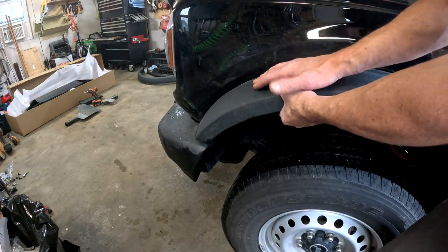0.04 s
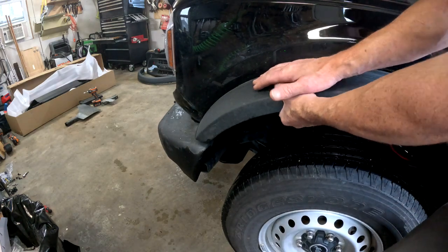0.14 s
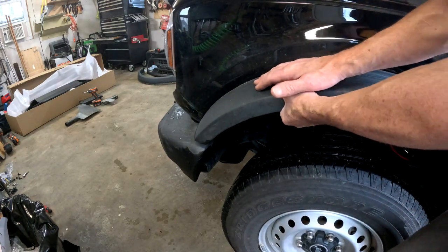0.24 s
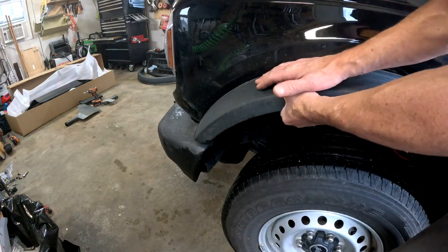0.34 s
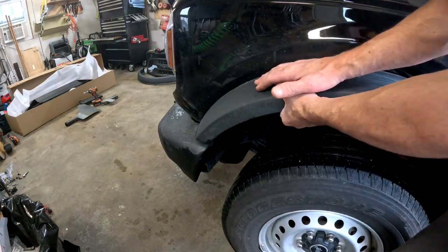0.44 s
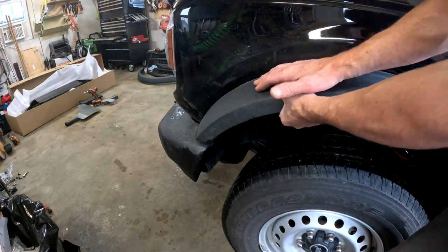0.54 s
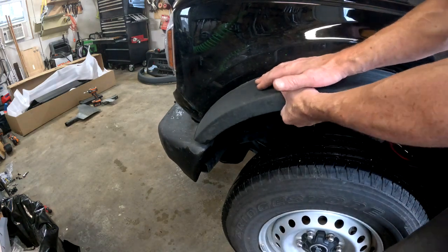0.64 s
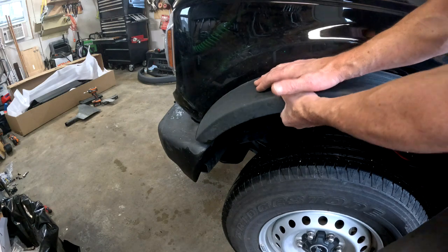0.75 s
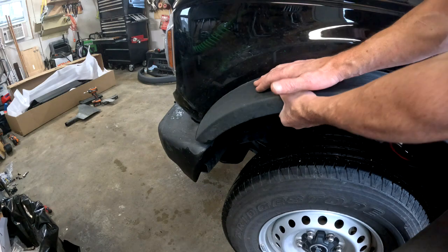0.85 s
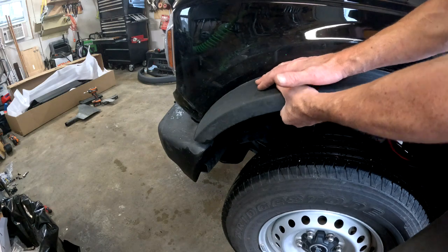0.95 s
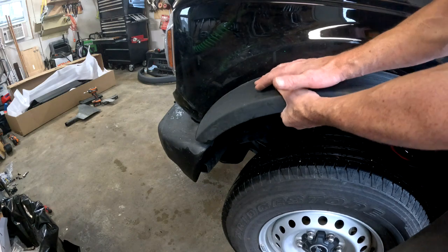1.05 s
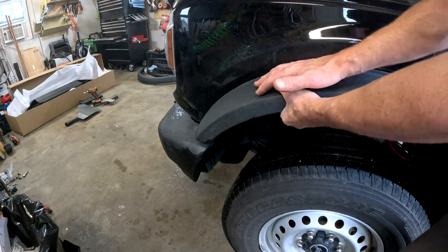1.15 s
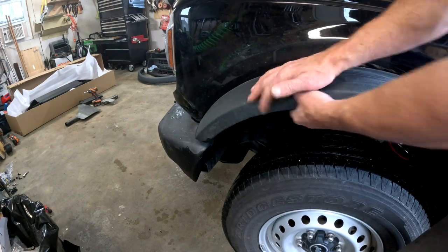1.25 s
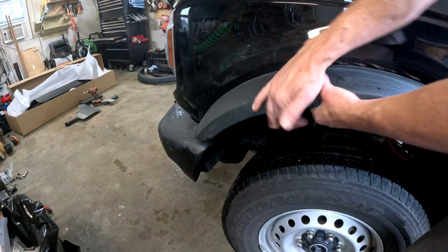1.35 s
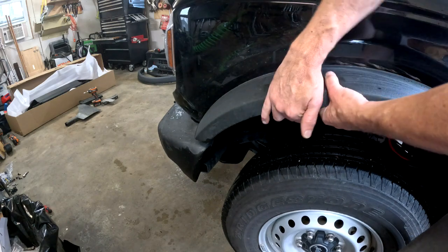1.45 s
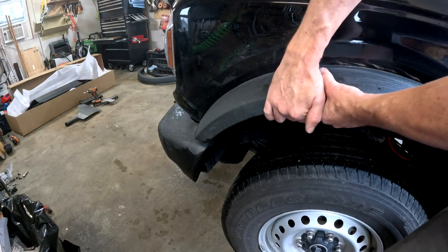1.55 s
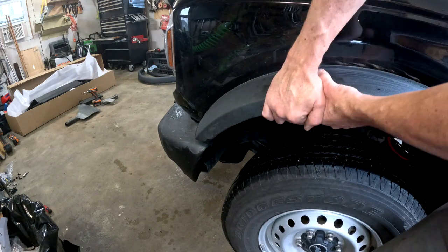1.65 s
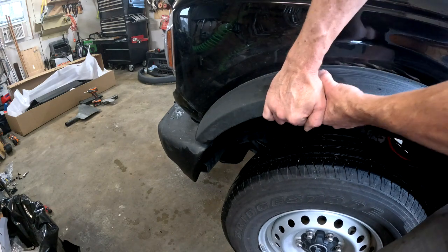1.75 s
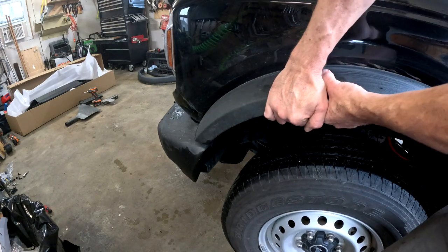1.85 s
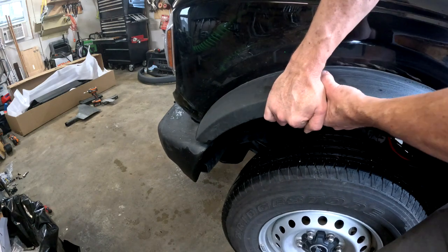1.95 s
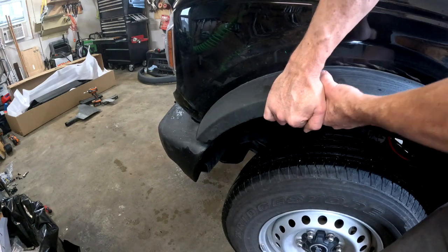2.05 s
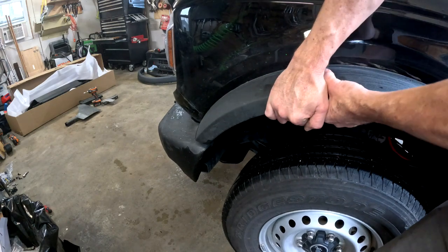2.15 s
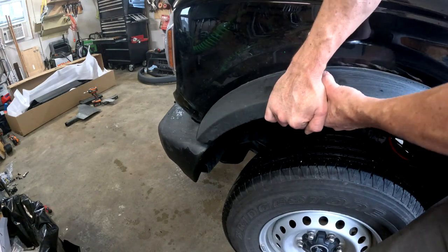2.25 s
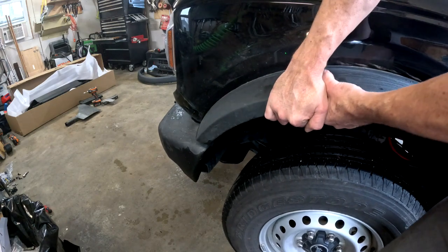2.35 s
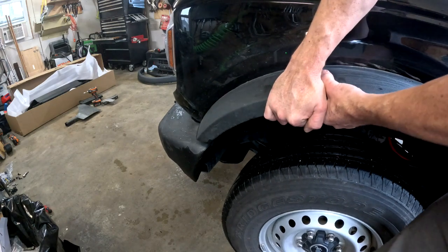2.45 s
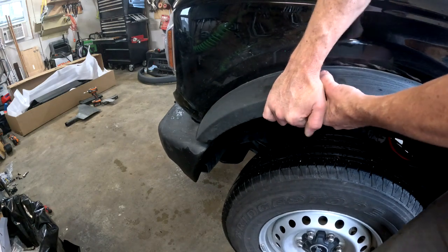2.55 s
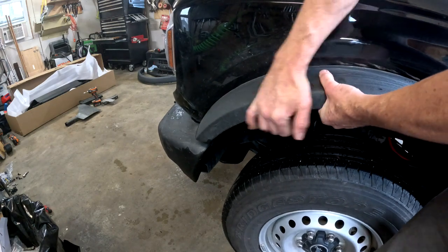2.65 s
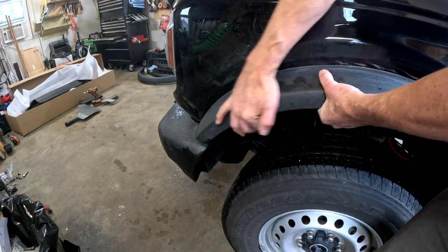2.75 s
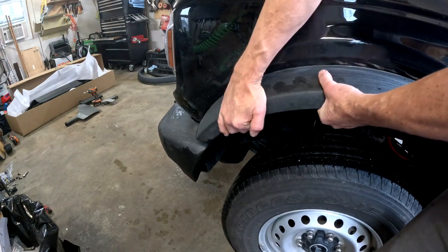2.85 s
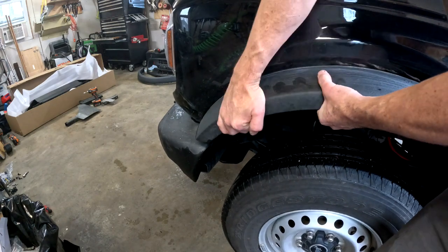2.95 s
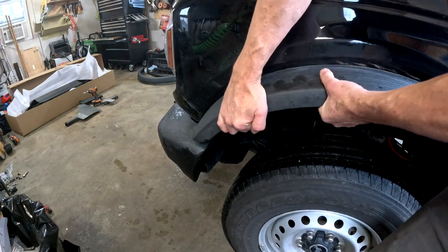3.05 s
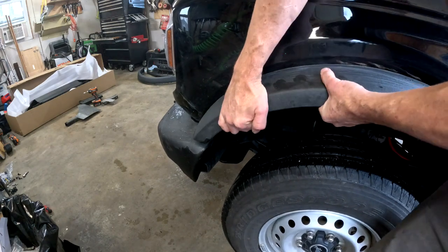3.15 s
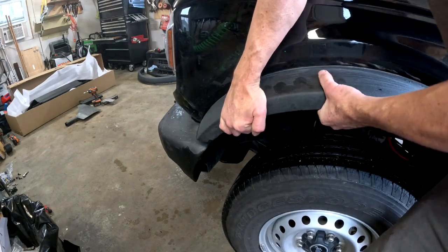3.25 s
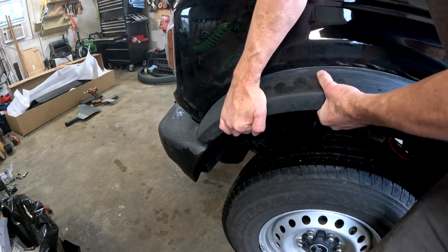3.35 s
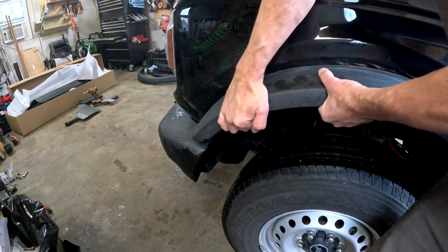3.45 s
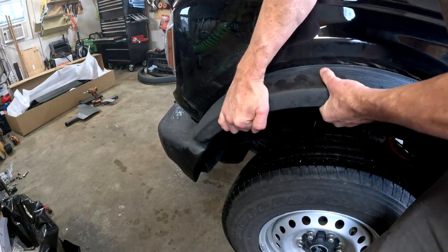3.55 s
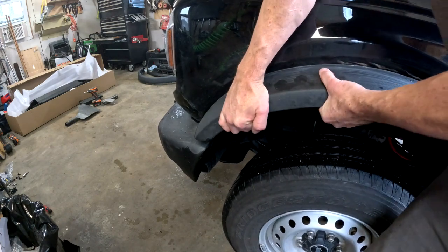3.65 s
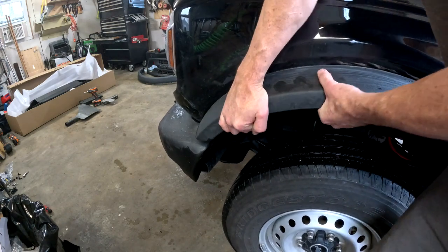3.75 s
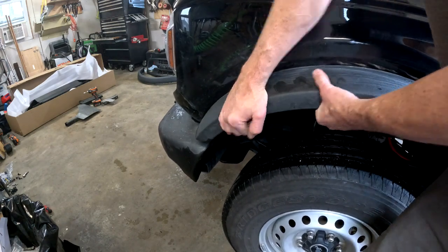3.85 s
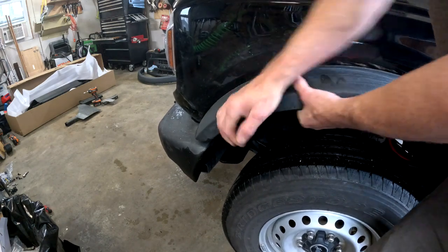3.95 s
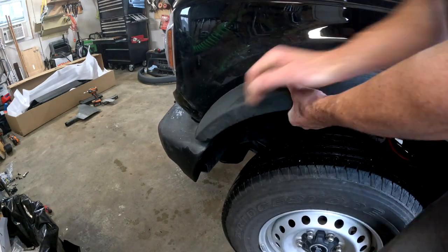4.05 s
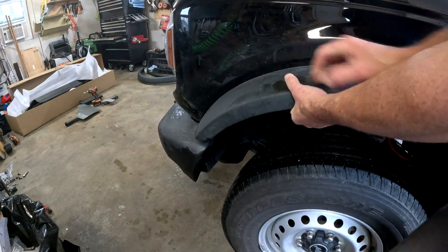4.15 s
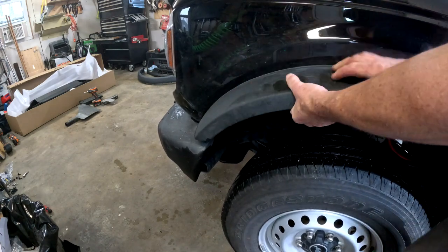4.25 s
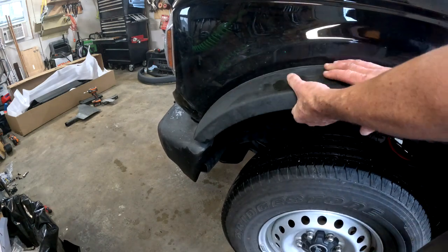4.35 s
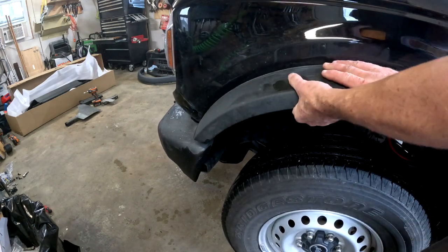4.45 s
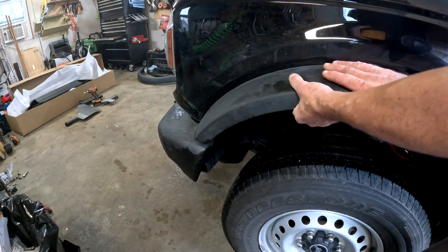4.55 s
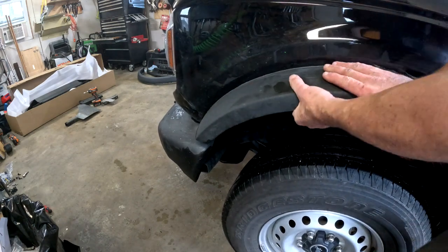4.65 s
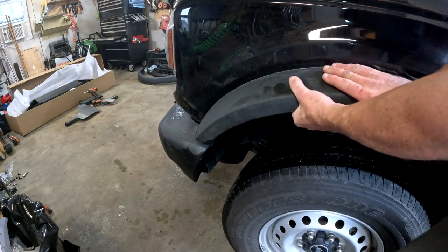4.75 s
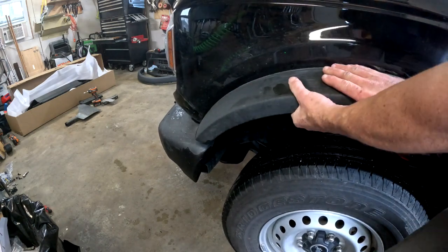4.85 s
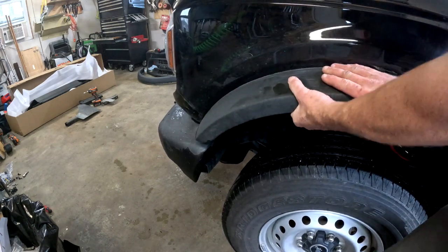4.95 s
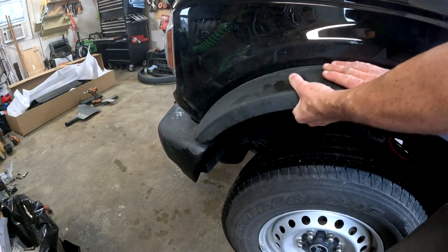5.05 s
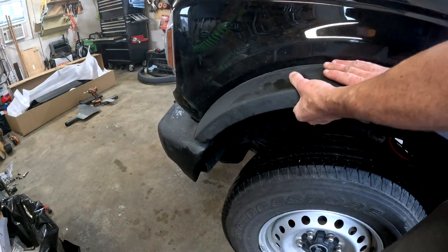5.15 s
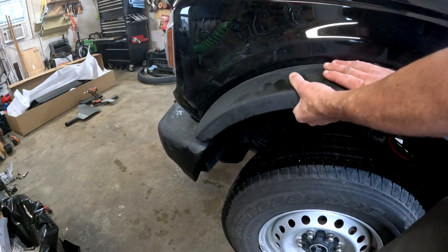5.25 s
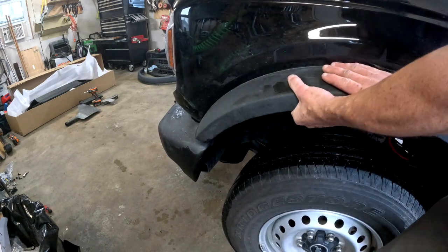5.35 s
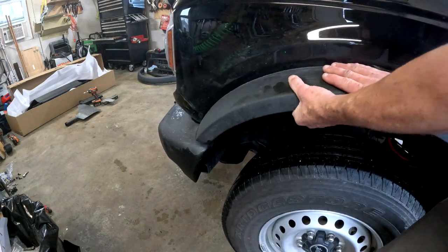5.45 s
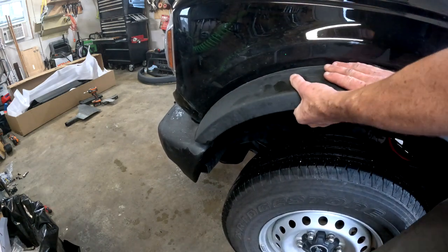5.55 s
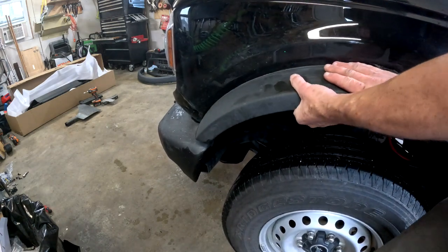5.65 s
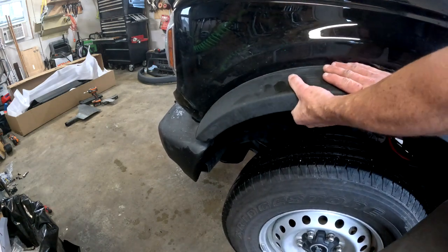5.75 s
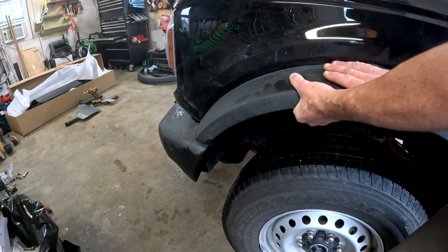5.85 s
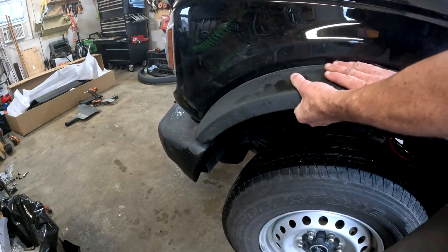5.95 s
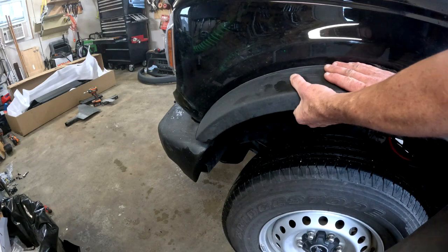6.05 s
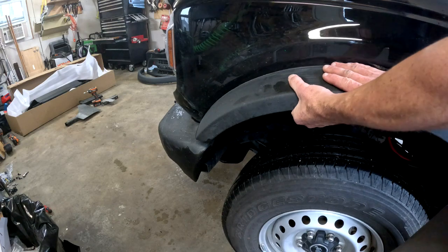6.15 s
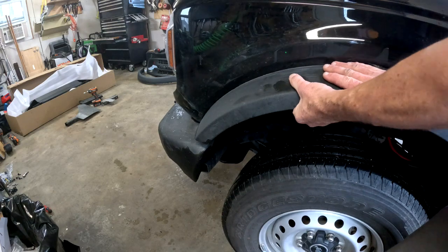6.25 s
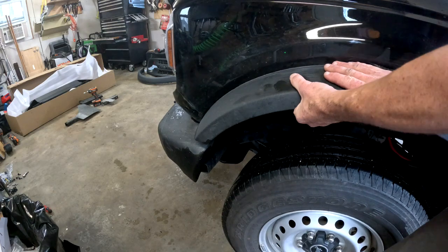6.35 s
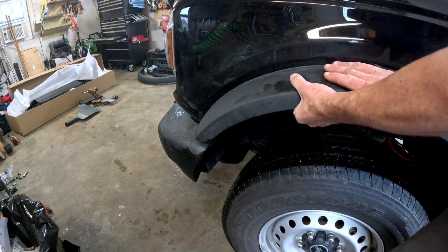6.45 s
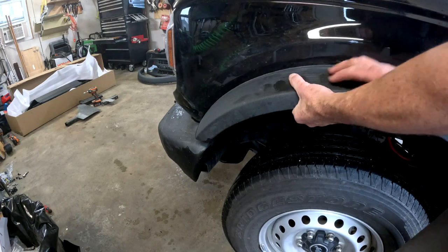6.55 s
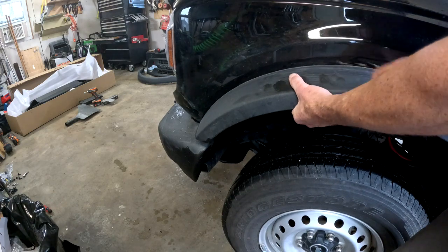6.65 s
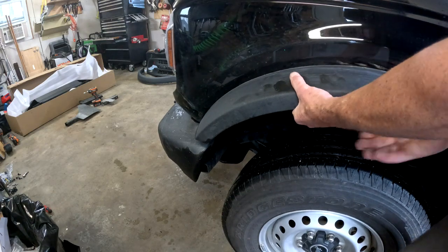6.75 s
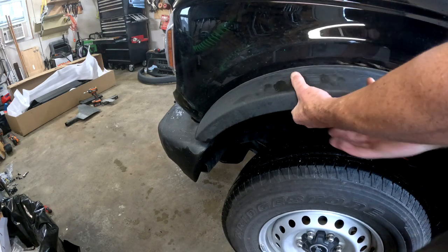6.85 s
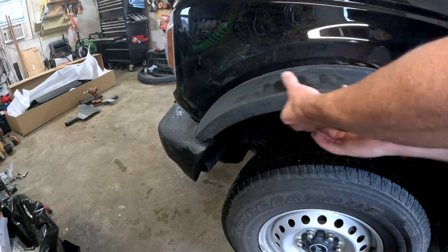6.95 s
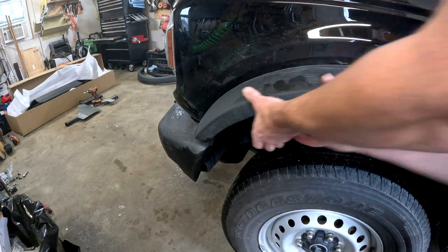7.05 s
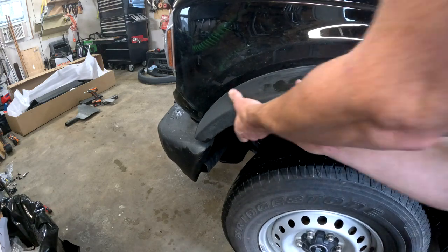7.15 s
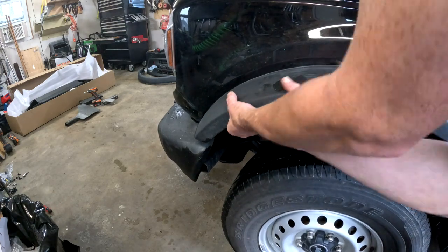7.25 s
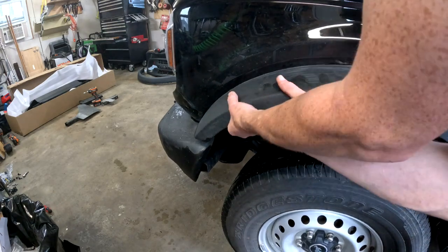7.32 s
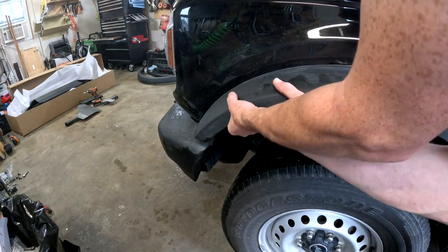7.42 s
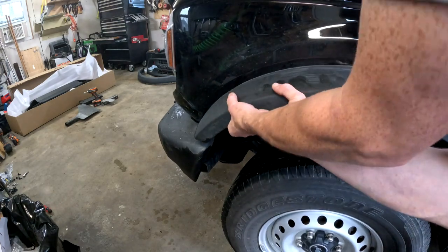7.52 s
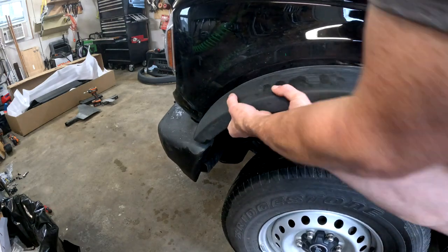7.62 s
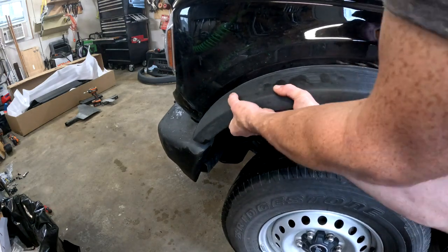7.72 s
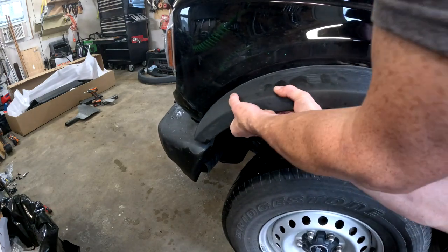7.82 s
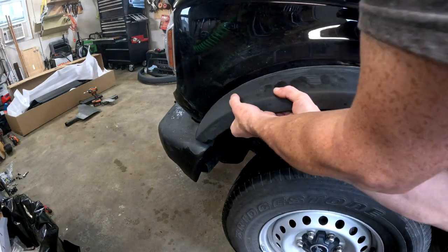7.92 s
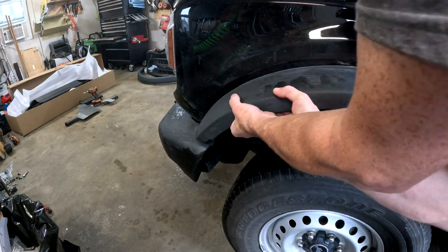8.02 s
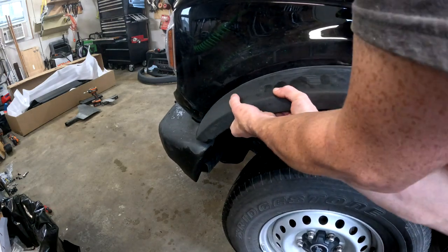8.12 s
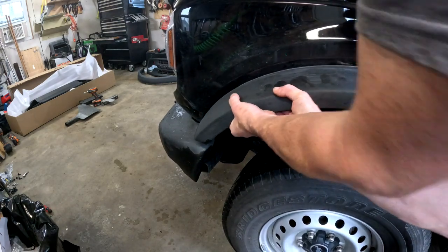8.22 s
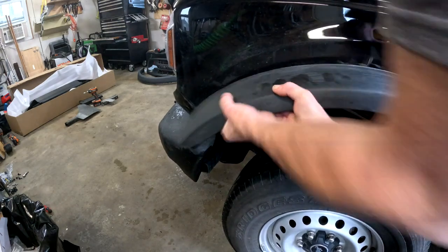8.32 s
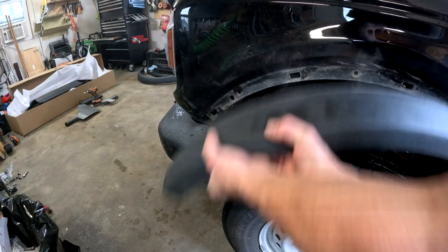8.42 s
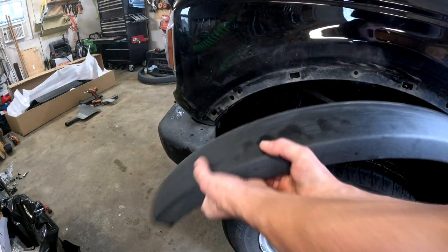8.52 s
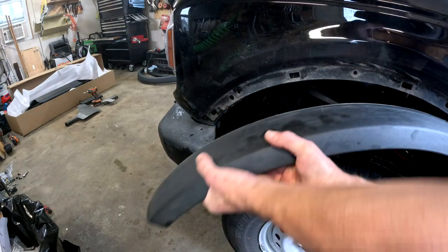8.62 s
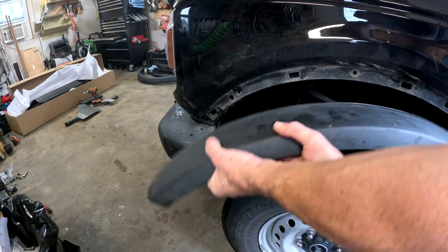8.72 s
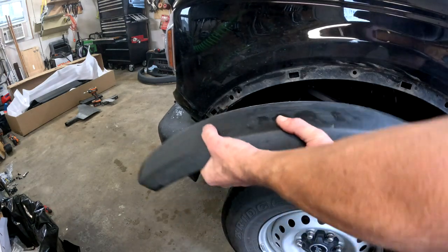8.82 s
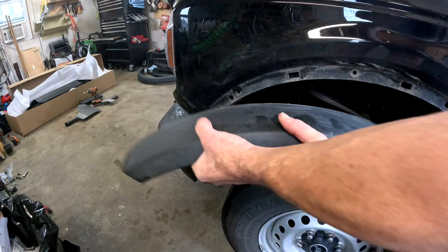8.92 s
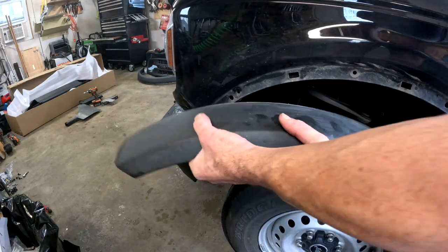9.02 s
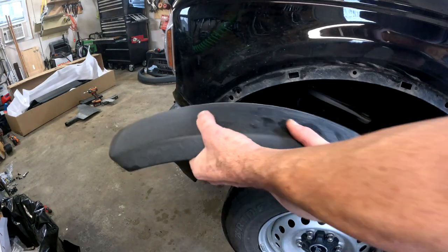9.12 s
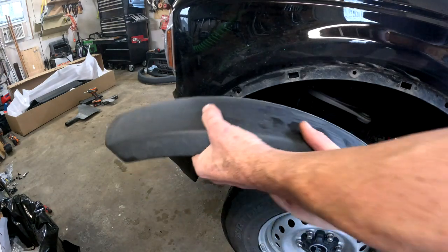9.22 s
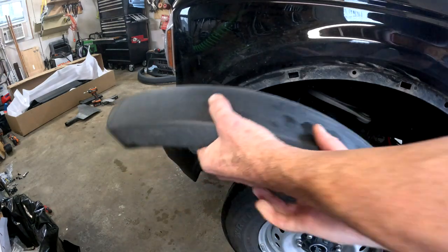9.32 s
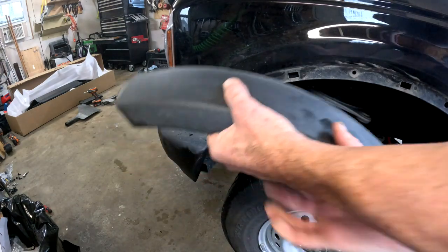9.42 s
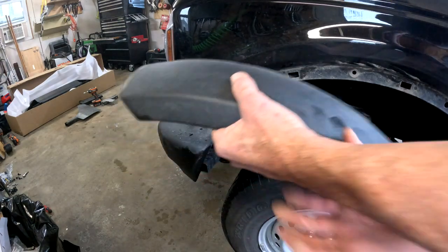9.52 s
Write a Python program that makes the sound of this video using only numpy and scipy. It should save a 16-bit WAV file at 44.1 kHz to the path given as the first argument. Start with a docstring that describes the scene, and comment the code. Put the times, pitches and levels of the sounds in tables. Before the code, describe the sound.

Hands pull at a plastic wheel-arch trim on a truck, heard close up over the faint hush of a garage. From the start, uneven tugs make the panel thud, creak and scrape against the steel body, with small ticks from its clips and soft swishes as palms change grip. A sharper click and knock stands out at about 1.8 seconds. Firmer knocks come around 3.3 to 3.5 seconds, a hand slides near 4, and a crisp tick sounds at 4.8. The tugging continues, with a stronger knock at 6.8 seconds. Just before 8 seconds the sound dips briefly. At about 8.4 the last clip opens with a hard, dry crack, and the freed panel booms and rattles against the body, the loudest moment, with a short room echo. This fades by 9 seconds, leaving faint finger rubbing and a light tap on the plastic at 9.3.

```python
"""A garage: two hands work a plastic wheel-arch trim loose from a truck, heard close up.
Each tug makes the held panel knock, creak and tick against the steel wing; palms slide to a new grip.
The level dips briefly, then the last clip cracks open and the freed panel booms and rattles into the room.
Friction is stick-slip noise; impacts are damped modes and noise bursts."""
import sys
import numpy as np
from scipy import signal
from scipy.fft import rfft, irfft, next_fast_len
from scipy.io import wavfile
from scipy.ndimage import map_coordinates

SR = 44100
rng = np.random.default_rng(int(sys.argv[2]) if len(sys.argv) > 2 else 0)


def digitize_waveform(pressure):
    """Quantize a signal to 16-bit integers and store it at the path in sys.argv[1].

    Rows of a 2-D input are taken as channels; values are limited to [-1, 1].
    """
    field = np.atleast_2d(pressure).T
    bounded = np.clip(field, -1, 1)
    quanta = np.round(bounded * 32767).astype(np.int16)
    wavfile.write(sys.argv[1], SR, quanta)


N = 422478

# spectrum of the whole panel swaying: freq_hz, gain_db
SWAY_SPECTRUM = [(12, -15.5), (25, 0), (48, 1.5), (64, -1), (85, -6.5), (130, -10.5), (200, -22.5),
                 (1500, -110)]
# spectrum of plastic striking the wing: freq_hz, gain_db
CLACK_SPECTRUM = [(150, -8), (330, 1), (410, -7), (490, 3), (550, -6), (610, 0), (800, -2), (950, -1),
                  (1130, 0.5), (1400, -3), (1750, -9.5), (2300, -24.5), (5000, -39), (12000, -75.5)]
DRAG_S = 8.43  # the last pull reaches full speed


def amp(db):
    """Decibels to gain."""
    return 10 ** (np.asarray(db) / 20)


def unit(x):
    """Scale to rms 1."""
    return x / np.sqrt(np.mean(x ** 2) + 1e-20)


def along(points, hz):
    """Interpolate (freq_hz, value) points on a log axis."""
    freq_hz, values = np.transpose(points)
    return np.interp(np.log(hz + 1), np.log(freq_hz + 1), values)


def filtered(x, response):
    """Apply a frequency response."""
    n = x.shape[-1]
    padded = next_fast_len(n + 4096)
    return irfft(rfft(x, padded) * response(np.fft.rfftfreq(padded, 1 / SR)), padded)[..., :n]


def shaped(x, spectrum):
    """Filter by (freq_hz, gain_db) points."""
    return filtered(x, lambda hz: amp(along(spectrum, hz)))


def noise(spectrum, size=N):
    """Coloured noise, mid and side, rms 1."""
    return unit(shaped(rng.standard_normal((2, size)), spectrum))


def add(track, start_s, sound):
    """Mix a sound into a track."""
    part = track[..., max(round(start_s * SR), 0):][..., :sound.shape[-1]]
    part += sound[..., :part.shape[-1]]


def onset_level(x, db, window_s):
    """Scale a hit to an rms level over its opening window."""
    onset = np.atleast_2d(x)[0, :int(window_s * SR)]
    return x * amp(db) / np.sqrt(np.mean(onset ** 2) + 1e-20)


def flutter(rate_hz, depth_db):
    """Gain of a contact that catches and eases, rms 1."""
    knots = rng.standard_normal(int(N * rate_hz / SR) + 4)
    return unit(amp(depth_db * map_coordinates(knots, [np.arange(N) * rate_hz / SR])))


def swells(peak_s, length_s, level_db, rise_share, roundness):
    """Gain of hand movements that build and ease; length_s spans the -20 dB points."""
    t = np.arange(0, N / SR, 0.001)
    rise = np.clip(rise_share, 0.05, 0.95)
    offset = (t[:, None] - peak_s) / length_s
    fade_db = -20 * np.maximum(-offset / rise, offset / (1 - rise)) ** roundness
    return np.interp(np.arange(N) / SR, t, np.linalg.norm(amp(level_db + fade_db), axis=1))


def drag(db, hold_s, fall_db_per_s):
    """Gain of the last pull: rise at 430 dB/s, hold, fall."""
    t = np.arange(N) / SR - DRAG_S
    return amp(db + 430 * np.minimum(t, 0) - fall_db_per_s * np.maximum(t - hold_s, 0))


def slips(spectrum, rate_hz, spread_db, smooth):
    """Stick-slip friction: tiny random jerks over a smooth rub, rms 1."""
    jerks = (rng.random(N) < rate_hz / SR) * amp(spread_db * np.clip(rng.standard_normal(N), -2, 2))
    grains = shaped(jerks * rng.choice([-1, 1], (2, N)), spectrum)
    return unit(unit(grains) + smooth * noise(spectrum))


def ring(modes, t, scatter_db):
    """Struck modes at scattered strengths; neighbours swing in opposite senses."""
    out = np.zeros(len(t))
    for k, (hz, db, t60_s) in enumerate(modes):
        envelope = amp(db + scatter_db * rng.standard_normal() - 60 * t / t60_s)
        out += (-1) ** k * envelope * np.sin(2 * np.pi * hz * t)
    return out


def burst(spectrum, t, t60_s, tail_db, tail_t60_s):
    """Crowded plastic modes as noise: sharp rise, quick fall, weaker tail."""
    rise = 1 - np.exp(-t / 0.0003)
    fall = amp(-60 * t / t60_s) + amp(tail_db - 60 * t / tail_t60_s)
    return noise(spectrum, size=len(t)) * rise * fall


def air():
    """Hush of the garage, duller after the dip."""
    # hush before the dip: freq_hz, gain_db
    early_spectrum = [(12, -41), (20, -5), (44, 4.5), (191, -7.5), (788, -40.5), (1070, -10.5), (1300, -8),
                      (2150, -15.5), (2330, -17.5), (2540, -13.5), (3960, -25.5), (4950, -18),
                      (10200, -33.5), (13900, -51), (15500, -66)]
    # hush after the dip: freq_hz, gain_db
    late_spectrum = [(20, -2), (50, -1.5), (72, -12), (130, -3), (230, -12.5), (285, -8), (480, -22),
                     (820, -10.5), (1260, -16.5), (2900, -21), (5000, -29.5), (7200, -37), (9000, -62),
                     (14000, -100)]
    # hush levels: time_s, early_db, late_db
    levels = [(0, -64, -110), (7.94, -61.5, -110), (7.96, -110, -42.5), (8.35, -110, -41.5),
              (8.9, -110, -56), (9.58, -110, -58.5)]
    time_s, *columns_db = np.transpose(levels)
    early, late = [amp(np.interp(np.arange(N) / SR, time_s, db, right=-np.inf)) for db in columns_db]
    return early * noise(early_spectrum) + late * noise(late_spectrum)


def garage(x):
    """Walls and floor reverberate, each frequency dying at its own rate."""
    # room decay: freq_hz, t60_s
    decay = [(100, 0.76), (400, .6), (1500, 0.54), (4000, 0.77), (9000, 0.24)]
    hz, t, bins = signal.stft(rng.standard_normal((2, SR * 3 // 4)), SR, nperseg=256)
    tail = signal.istft(bins * amp(-60 * t / along(decay, hz)[:, None]), SR, nperseg=256)[1]
    return signal.fftconvolve(x[:1], tail / np.linalg.norm(tail[0]), axes=1)[:, :N]


def wing():
    """The steel wing swings low when pressed and when it springs back."""
    # flexing steel: start_s, pitch_hz, level_db, t60_s
    swings = [(0.1, 146, -29.5, 0.27), (8.5, 48.4, -22.5, 2.9)]
    out, t = np.zeros((2, N)), np.arange(2 * SR) / SR
    rise = 1 - np.exp(-t / 0.003)
    for start_s, hz, db, t60_s in swings:
        add(out[0], start_s, amp(db - 60 * t / t60_s) * rise * np.sin(2 * np.pi * hz * t))
    return out


def palms():
    """Skin swishes over the panel as the hands change grip."""
    # hand slides: peak_s, length_s, rise_share, low_db, high_db
    strokes = [(0.739, 0.14, 0.26, -43.5, -67), (1.04, 0.11, .25, -47, -66),
               (1.318, 0.13, 0.36, -45.5, -44.5), (1.36, 0.095, 0.53, -42.5, -54),
               (1.445, 0.16, 0.37, -45, -54), (2.25, 0.12, 0.34, -51, -63), (2.701, .12, 0.31, -42, -51),
               (2.86, 0.31, 0.71, -47, -48), (3.948, 0.12, 0.21, -35, -46), (4.021, 0.18, 0.24, -52, -57),
               (6.671, 0.12, 0.52, -53, -45.5)]
    # low swish: freq_hz, gain_db
    low_spectrum = [(400, -17), (780, -15), (920, 4), (1010, -2), (1130, 7), (1270, -5.5), (1420, 0),
                    (1700, 1), (2100, -14), (5000, -41), (14000, -70)]
    # high swish: freq_hz, gain_db
    high_spectrum = [(1500, -26), (2200, -10.5), (2750, -4), (3300, -14.5), (4200, -18), (14000, -40)]
    peak_s, length_s, rise_share, low_db, high_db = np.transpose(strokes)
    low = swells(peak_s, 1.06 * length_s, low_db - 1, rise_share, roundness=1.04)
    high = swells(peak_s, length_s, high_db - 0.5, rise_share, roundness=1.06)
    rub = slips(low_spectrum, rate_hz=900, spread_db=1.5, smooth=0.55)
    return low * rub + high * noise(high_spectrum)


def ticks():
    """Barbs slip in their holes and nails catch the edge, each with its own broad resonance."""
    # clip and nail ticks: start_s, level_db, pitch_hz, limit_hz
    catches = [(0.197, -59.5, 4000, 10100), (0.599, -43, 3200, 7800), (0.965, -43.5, 2730, 13000),
               (1.127, -54, 4110, 12200), (1.201, -55, 2800, 11000), (1.236, -52.5, 2380, 9200),
               (1.268, -46.5, 2400, 11900), (1.675, -66, 3000, 10000), (1.705, -57.5, 3000, 10000),
               (1.796, -52.5, 2980, 10000), (1.849, -26, 2270, 7450), (1.855, -35, 2400, 6800),
               (1.863, -37, 2400, 6800), (1.877, -39.5, 2400, 6800), (2.165, -45.5, 5100, 14000),
               (2.582, -53, 3000, 10100), (2.699, -40.5, 1710, 3520), (2.979, -55, 3000, 10000),
               (3.921, -42, 4200, 13100), (4.533, -54.5, 3530, 11300), (4.843, -30, 2480, 9900),
               (6.495, -53, 3850, 10600), (7.036, -67, 2390, 8000), (7.312, -51, 3000, 10000),
               (7.471, -55, 2720, 10200), (8.366, -37.5, 2506, 7080), (9.286, -42, 1194, 4540)]
    out, t = np.zeros((2, N)), np.arange(SR // 5) / SR
    for start_s, db, hz, limit_hz in catches:
        spectrum = [(hz / 8, -28), (hz / 1.9, -1), (hz, 0), (hz * 1.62, -3.5),
                    (limit_hz, -20), (limit_hz * 1.3, -42), (limit_hz * 3, -80)]
        tick = burst(spectrum, t, t60_s=0.02, tail_db=-16.5, tail_t60_s=0.12)
        add(out, start_s, onset_level(tick, db + 0.41, window_s=0.007))
    return out


def knocks():
    """The held panel jumps in its clips: damped thuds, a clack and a gritty crunch."""
    # panel knocks: start_s, thud_db, clack_db, crunch_db
    hits = [(0.329, -36.5, -56.5, -52), (0.549, -34.5, -38.5, -50.5), (0.588, -35, -42, -52),
            (0.687, -28.5, -44.5, -51), (0.858, -40, -52, -57), (0.984, -31, -46.5, -49.5),
            (1.02, -38, -46, -67), (1.46, -36.5, -45, -65), (1.846, -25, -33, -39), (2.054, -39, -63, -59),
            (2.163, -42, -57, -59), (2.209, -49, -44.5, -68), (2.319, -32.5, -41, -47.5),
            (3.145, -39.5, -45.5, -52), (3.305, -32.5, -36, -38.5), (3.329, -36, -49, -62),
            (3.53, -26.0, -45, -48.5), (3.667, -41.5, -50, -60), (3.797, -59, -47.5, -46.5),
            (4.57, -57, -47.5, -49), (5.105, -36.5, -42, -43), (5.179, -46.5, -52.5, -49),
            (5.385, -33, -51, -68), (5.745, -59, -44.5, -45.5), (5.795, -32, -42, -40.5),
            (6.094, -44, -46, -43), (6.13, -67, -47.5, -41), (6.824, -23, -29, -49.5),
            (7.033, -46, -42, -42), (7.133, -40, -46.5, -53), (7.35, -66, -46.5, -51),
            (7.735, -38, -47.5, -50), (7.902, -43, -65, -62)]
    # modes of the held panel: freq_hz, level_db, t60_s
    held_modes = [(80, -15.5, 0.086), (168.2, -2, 0.13), (215.8, -1.5, 0.15), (260.8, 2.5, 0.12),
                  (302, -1, .11), (349.6, -4, 0.072), (491.5, -12, 0.16), (595, -7, 0.037)]
    # gritty contact: freq_hz, gain_db
    crunch_spectrum = [(800, -17), (2200, 3.5), (4000, -3.5), (6500, -6.5), (8500, -14), (10300, -19),
                       (12000, -23.5), (15000, -50)]
    out, t = np.zeros((2, N)), np.arange(SR // 3) / SR
    for start_s, thud_db, clack_db, crunch_db in hits:
        thud = np.zeros(len(t))
        for delay_s, db in [(0, 0), (0.012, -5), (0.034, -13)]:  # contact, two rebounds
            tuning = np.exp(0.061 * rng.standard_normal())  # the hands retune the panel
            contact_s = delay_s * rng.uniform(0.71, 1.3)
            add(thud, contact_s, amp(db) * ring(held_modes, t * tuning, scatter_db=2.5))
        clack = burst(CLACK_SPECTRUM, t, t60_s=0.13, tail_db=-5.5, tail_t60_s=0.26)
        crunch = burst(crunch_spectrum, t, t60_s=0.067, tail_db=-6, tail_t60_s=0.27)
        add(out[0], start_s, onset_level(thud, thud_db - 3, window_s=0.035))
        add(out, start_s, onset_level(clack, clack_db + 0.49, window_s=0.013))
        add(out, start_s, onset_level(crunch, crunch_db - 2, window_s=0.0133))
    return out


def tugging():
    """With each tug the gritty edge scrapes the paint, the shell creaks, then the whole panel sways."""
    # pulls on the held panel: peak_s, length_s, sway_db, flex_db, scrape_db
    tugs = [(0.083, 0.18, -65, -39, -55), (0.353, 0.12, -41.5, -44.5, -53.5), (0.6, .16, -42, -38.5, -57),
            (0.701, 0.17, -40, -35.5, -56), (0.858, 0.16, -43, -39, -56), (1.001, 0.15, -43, -33, -56.5),
            (1.143, 0.21, -51, -50, -61), (1.298, .19, -47, -42.5, -55), (1.471, 0.21, -39, -44.5, -55),
            (1.66, 0.53, -50, -55.5, -61.5), (1.884, 0.19, -41.5, -35, -51.5),
            (2.059, 0.18, -46, -39.5, -53), (2.201, 0.13, -36.5, -33.5, -52.5),
            (2.334, 0.15, -38, -32.5, -50.5), (2.452, 0.12, -38, -44, -54.5), (2.583, 0.2, -53, -47, -61),
            (2.71, 0.15, -50.5, -47.5, -57), (2.859, 0.23, -64, -68, -51), (2.953, 0.3, -57, -54.5, -63),
            (3.165, 0.19, -38.5, -38, -54), (3.314, 0.18, -39, -33, -49.5), (3.558, 0.12, -33, -29.5, -49),
            (3.675, 0.25, -45.5, -45, -62), (3.817, 0.2, -68, -42.5, -54), (3.972, 0.13, -43, -37, -59),
            (4.038, 0.18, -50, -57, -49.5), (4.13, 0.14, -61, -52, -61), (4.381, 0.19, -43.5, -49, -58.5),
            (4.473, 0.31, -59, -50, -57.5), (4.576, 0.18, -65, -51.5, -62.5), (4.815, 0.34, -50, -47, -58),
            (4.903, .15, -66, -65, -53), (5.125, 0.15, -39.5, -36.5, -50), (5.39, 0.16, -43.5, -37, -55.5),
            (5.597, 0.15, -39.5, -42, -54.5), (5.798, 0.16, -43.5, -36.5, -49),
            (5.956, 0.12, -38.5, -41.5, -51), (6.141, .17, -64, -56, -54.5),
            (6.222, 0.11, -58, -45.5, -62.5), (6.346, 0.2, -45, -51, -58), (6.64, 0.29, -53, -51, -56.5),
            (6.861, 0.12, -33, -36.5, -54.5), (6.925, 0.23, -39, -56, -69), (7.06, 0.13, -41, -38, -54),
            (7.179, 0.2, -37.5, -44.5, -52.5), (7.35, 0.3, -41, -49.5, -56.5),
            (7.582, .12, -52.5, -65, -84), (7.75, 0.16, -37.5, -37, -50), (7.934, 0.092, -48, -48.5, -56.5)]
    # creak of the bending shell: freq_hz, gain_db
    flex_spectrum = [(70, -49), (150, -8.5), (230, 1.5), (310, -3.5), (420, -12.5), (620, -14), (800, -19),
                     (1100, -21), (2000, -44), (12000, -88)]
    # edge on paint: freq_hz, gain_db
    scrape_spectrum = [(300, -13), (800, -7.5), (1100, 6), (1600, 4.5), (2400, 2), (3600, 1), (5200, -1.5),
                       (8000, -7.5), (10200, -9.5), (11500, -17.5), (13800, -23.5), (15500, -44)]
    sway_lag_s, scrape_lead_s, end_s = 0.016, 0.0067, 7.955
    peak_s, length_s, sway_db, flex_db, scrape_db = np.transpose(tugs)
    sway = swells(peak_s + sway_lag_s, 1.09 * length_s, sway_db, rise_share=0.47, roundness=1.15)
    flex = swells(peak_s, length_s, flex_db, rise_share=0.4, roundness=1.13)
    scrape = swells(peak_s - scrape_lead_s, 1.184 * length_s, scrape_db, rise_share=0.52, roundness=1.18)
    grip = flutter(rate_hz=9, depth_db=4.5)  # small shifts between tugs
    rumble = noise(SWAY_SPECTRUM)
    creak = amp(-2.12) * slips(flex_spectrum, rate_hz=420, spread_db=0, smooth=0.52)
    rub = amp(2) * slips(scrape_spectrum, rate_hz=650, spread_db=1, smooth=1)
    grit = amp(-9) * slips(scrape_spectrum, rate_hz=60, spread_db=4, smooth=0)
    catching = flutter(rate_hz=55, depth_db=2.2)
    out = np.hypot(sway, amp(-62) * grip) * rumble
    out += np.hypot(flex, amp(-67) * grip) * creak
    out += np.hypot(scrape, amp(-72.5) * grip) * (catching * rub + grit)
    return out * (np.arange(N) / SR < end_s)


def freed_panel():
    """Dragged clear, the panel rings lower and longer, rattles along the wing and is carried off."""
    # panel hitting the wing: start_s, boom_db, clack_db, crunch_db, hollow_hz
    blows = [(8.396, -35, -41, -41, 452), (8.426, -28, -29.5, -39, 513), (8.486, -18.5, -35.5, -25.5, 696),
             (8.531, -15, -22, -29.5, 304), (8.575, -23.5, -31, -30.5, 308), (8.652, -15.5, -21, -27, 367),
             (8.735, -25, -42, -50, 396), (8.803, -36.5, -39.5, -36.5, 937)]
    # modes of the free panel: freq_hz, level_db, t60_s
    free_modes = [(109.5, -4, 0.4), (139.4, -1.5, .36), (157.8, -3, 0.33), (193, -9.5, 0.085),
                  (317, -10.5, 0.27), (359, -12.5, 0.18), (558, -22.5, 0.24), (632, -22, 0.54),
                  (707, -24, .35), (764, -30, 1.4)]
    # modes of its rim: freq_hz, level_db, t60_s
    rim_modes = [(1062, 8, 0.093), (1282, 10, 0.074), (1510, -12.5, .06), (3130, -9, .06), (4020, -15, .06)]
    # dragged shell: freq_hz, gain_db
    boom_spectrum = [(60, -26), (100, -8), (140, -3.5), (180, -2.5), (245, -13), (330, -10), (420, -17),
                     (650, -18), (1200, -39), (8000, -110)]
    # rattling edge: freq_hz, gain_db
    rattle_spectrum = [(240, -33.5), (400, -11.5), (436, -8.5), (509, -10.5), (571, -9), (792, -8),
                       (1040, -12), (1970, -8.5), (2140, -11), (2850, -16), (4250, -21), (7190, -31),
                       (12000, -81.5), (15600, -112), (22000, -120)]
    # crunch of a blow: freq_hz, gain_db
    crunch_spectrum = [(600, -24), (1200, -6.5), (2000, 3), (3000, -5.5), (4200, -8), (5200, -16),
                       (7300, -21.5), (9000, -36.5), (12000, -66.5)]
    # fingers shifting on the panel: peak_s, length_s, level_db
    shifts = [(9.189, .16, -55.5), (9.31, 0.17, -57), (9.56, 0.073, -61)]
    carried = flutter(rate_hz=12, depth_db=1) * (np.arange(N) / SR > DRAG_S)
    sway = drag(db=-19.5, hold_s=0.12, fall_db_per_s=83) + amp(-57) * carried
    flex = drag(db=-20, hold_s=0.28, fall_db_per_s=126)
    scrape = drag(db=-30, hold_s=0.35, fall_db_per_s=127) + amp(-73) * carried
    scrape += swells(*np.transpose(shifts), rise_share=0.48, roundness=1.4)
    out = amp(1.5) * sway * noise(SWAY_SPECTRUM)
    out += amp(1.5) * flex * slips(boom_spectrum, rate_hz=270, spread_db=2, smooth=0.66)
    out += amp(2.5) * scrape * slips(rattle_spectrum, rate_hz=500, spread_db=-0.5, smooth=1)
    t = np.arange(SR) / SR
    boom_lead_s = 0.008  # the shell swings just before it strikes
    for start_s, boom_db, clack_db, crunch_db, hz in blows:
        # pitch set by where the shell is struck
        hollow_modes = [(hz, 0, 0.14), (hz * 1.16, -2, 0.12), (hz * 1.85, -10, 0.1), (hz * 1.7, -10, 0.1)]
        boom = ring(free_modes, t, scatter_db=1.5)
        hollow = ring(hollow_modes, t, scatter_db=2.5)
        clack = burst(CLACK_SPECTRUM, t, t60_s=0.22, tail_db=-19.5, tail_t60_s=0.4)
        crunch = burst(crunch_spectrum, t, t60_s=0.11, tail_db=-13.5, tail_t60_s=0.18)
        add(out[0], start_s - boom_lead_s, onset_level(boom, boom_db + 3.2, window_s=0.071))
        add(out[0], start_s, onset_level(hollow, clack_db - 0.6, window_s=0.14))
        add(out, start_s, onset_level(clack, clack_db - 1, window_s=0.084))
        add(out, start_s, onset_level(crunch, crunch_db + 3.5, window_s=0.037))
    tap = amp(-41) * ring(rim_modes, t, scatter_db=5)  # a new grip taps the rim
    tap += amp(-42.5) * burst(CLACK_SPECTRUM, t, t60_s=0.12, tail_db=-5.5, tail_t60_s=0.28)[0]
    add(out[0], start_s=9.287, sound=tap)
    return filtered(out, lambda hz: amp(along([(7500, 2), (8600, 0.5), (10500, -12)], hz)))


def crack():
    """The last clip lets go with one hard, dry crack: its modes and a splintering burst."""
    clip_modes = [(546, -14.5, 0.022), (845, -13, .014), (1425, 6.5, 0.017), (1770, 1, 0.019),
                  (2194, 0, 0.013), (2537, -5, 0.017), (2966, -4.5, 0.016), (3690, -17.5, 0.036),
                  (4000, -5, 0.017), (5400, -16.5, 0.0092), (7700, -29, .005)]
    # splintering plastic: freq_hz, gain_db
    splinter_spectrum = [(400, -14.5), (1400, -4), (2500, -3.5), (3300, -10.5), (4000, -7), (5500, -16),
                         (9000, -33), (14000, -59.5)]
    out, t = np.zeros((2, N)), np.arange(SR // 10) / SR
    rise = 1 - np.exp(-t / 0.0007)
    snap = amp(7) * rise * ring(clip_modes, t, scatter_db=0.5)
    snap_side = -amp(-5) * np.roll(snap, 5)
    splinter = amp(-3.5) * burst(splinter_spectrum, t, t60_s=0.016, tail_db=-29.5, tail_t60_s=0.08)
    add(out, start_s=8.445, sound=np.array([snap, snap_side]))
    add(out, start_s=8.4457, sound=splinter)
    return out


def scene():
    """Mix all sources as mid and side, then spread to left and right."""
    # stereo width: freq_hz, side_db
    width = [(40, -24), (150, -20), (330, -18), (650, -9), (1400, -8), (3000, -5.5), (8000, -11),
             (13000, -15.5)]
    # stereo balance: freq_hz, left_minus_right_db
    balance = [(100, -0.2), (700, -0.5), (1400, 0.5), (5000, -0.5), (9000, 0.5), (13000, 3.5)]
    held = tugging() + palms() + knocks() + ticks()
    snap = crack()
    free = freed_panel()
    room = garage(amp(-20) * held + amp(-22) * snap + amp(-11) * free)
    mid, side = held + snap + free + wing() + room + air()
    side = shaped(side, width)
    left_lag_s = 1.2e-5  # the sound reaches the right port first
    split = np.array([[0.5], [-0.5]])
    ports = lambda hz: amp(along(balance, hz) * split) * np.exp(-2j * np.pi * hz * left_lag_s * split)
    return filtered(np.array([mid + side, mid - side]), ports)


def record(dry):
    """The level dips briefly; the camera rounds peaks near full scale and limits the band."""
    # level dip: time_s, gain_db
    dip = [(7.938, 3), (7.949, -28), (7.961, -31), (7.97, -12.5)]
    top_hz, taper_hz = 15300, 1200
    dipped = dry * amp(np.interp(np.arange(N) / SR, *np.transpose(dip)))
    rounded = dipped / (1 + dipped ** 6) ** (1 / 6)
    return filtered(rounded, lambda hz: np.clip((top_hz - hz) / taper_hz, 0, 1))


dry = scene()
out = record(dry)
digitize_waveform(out)
```